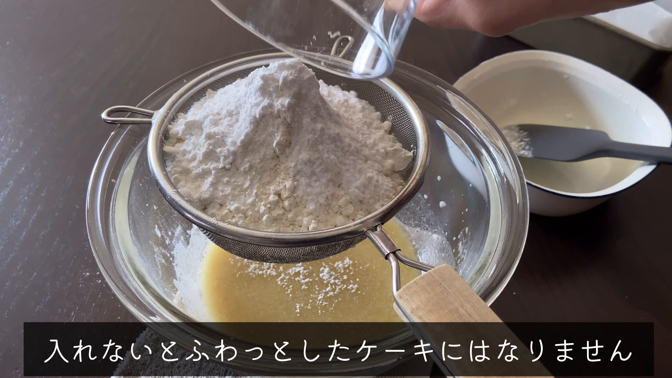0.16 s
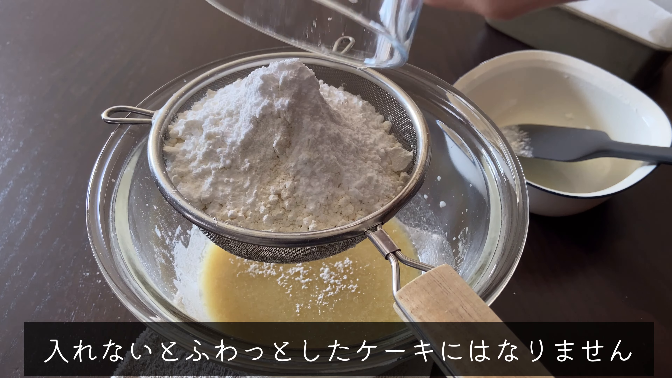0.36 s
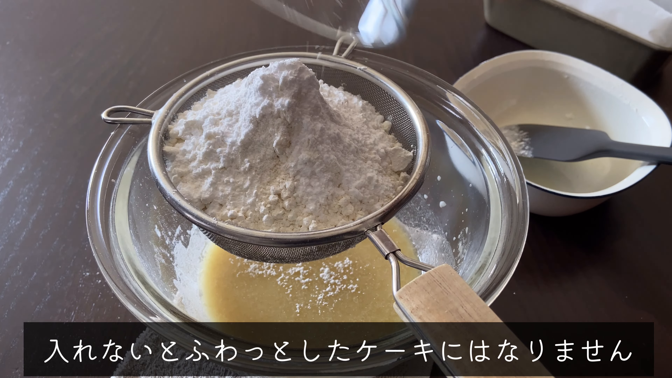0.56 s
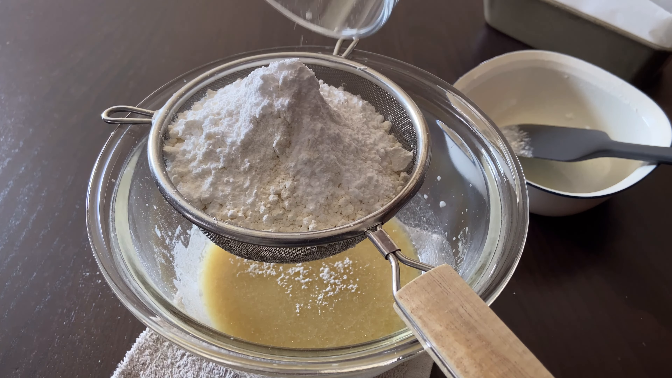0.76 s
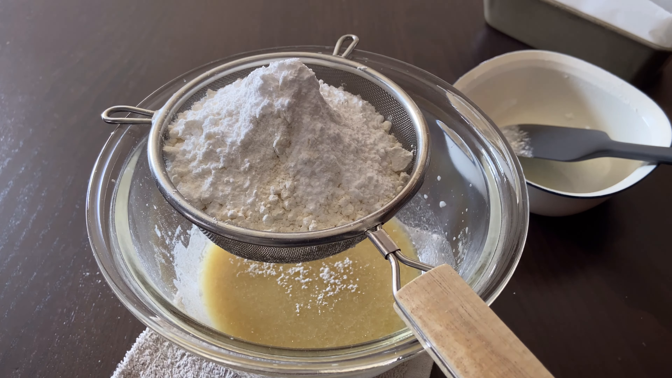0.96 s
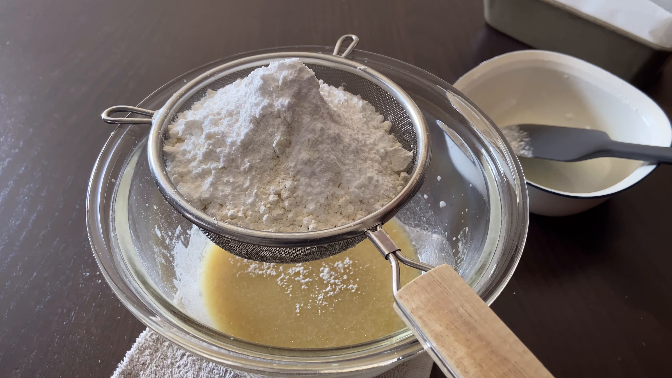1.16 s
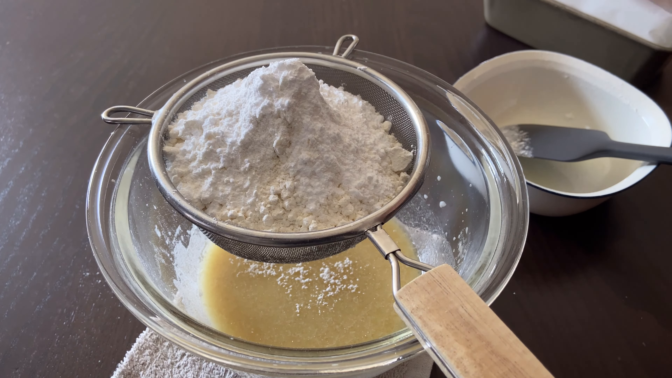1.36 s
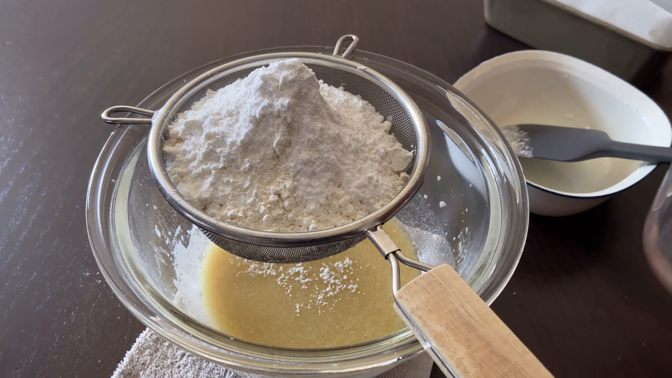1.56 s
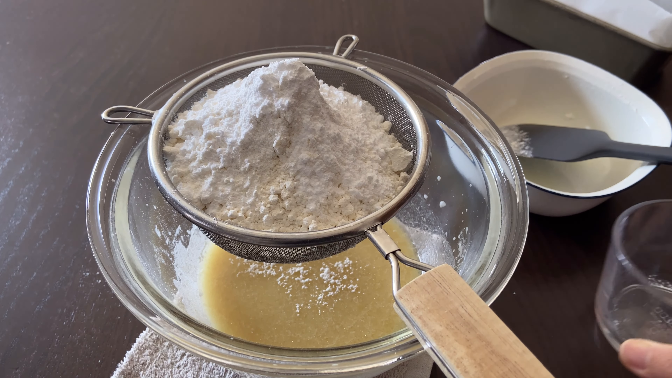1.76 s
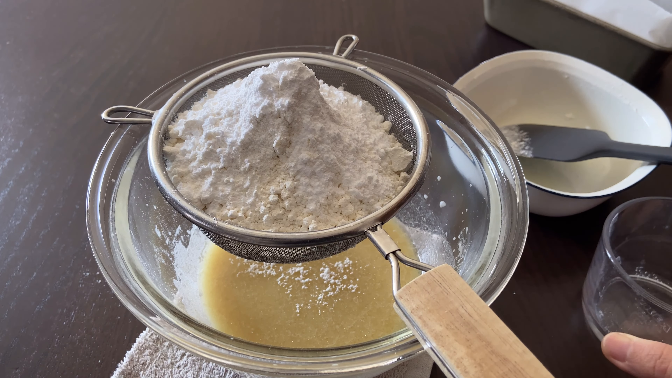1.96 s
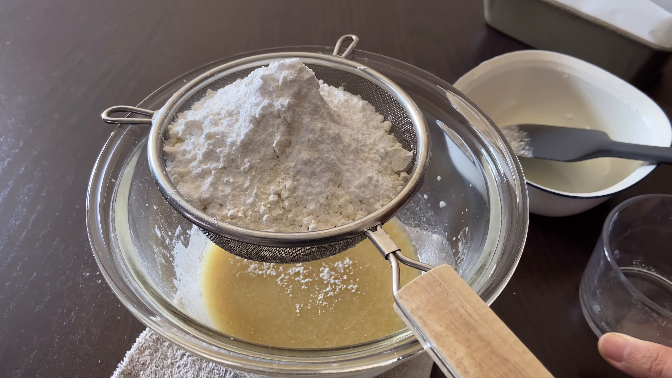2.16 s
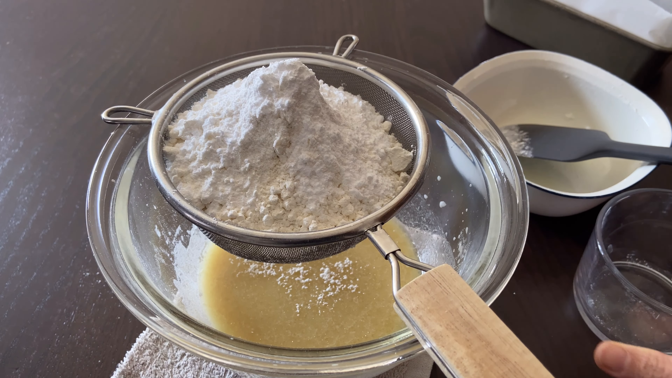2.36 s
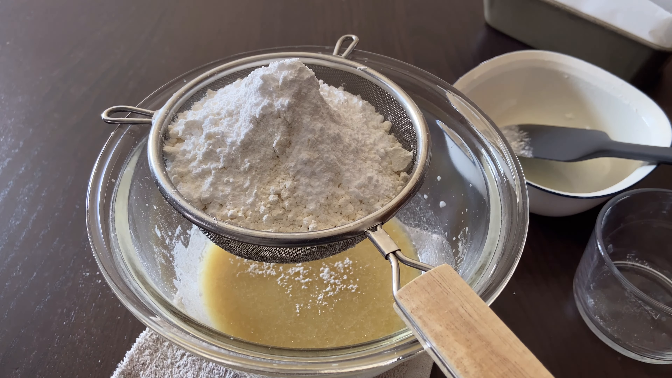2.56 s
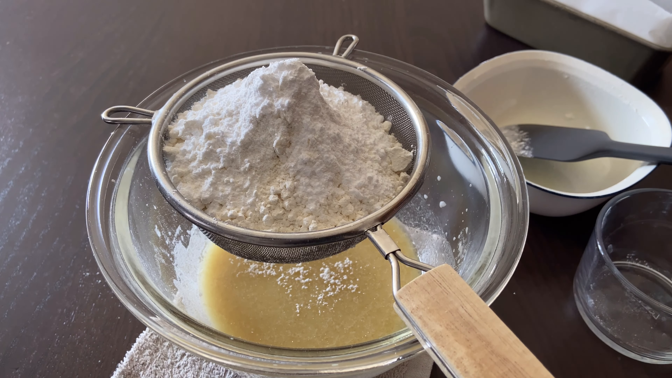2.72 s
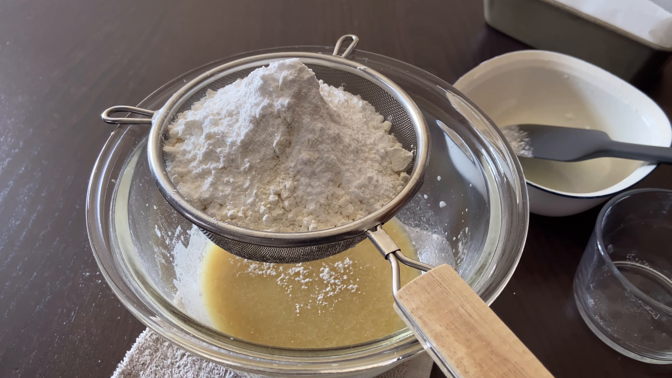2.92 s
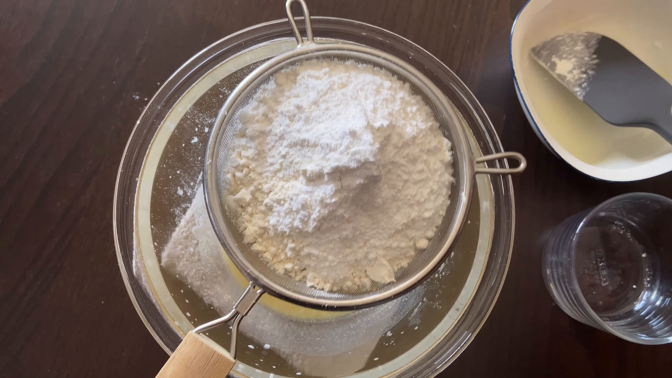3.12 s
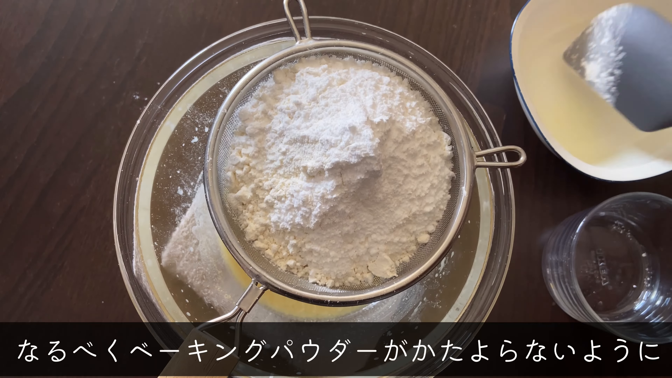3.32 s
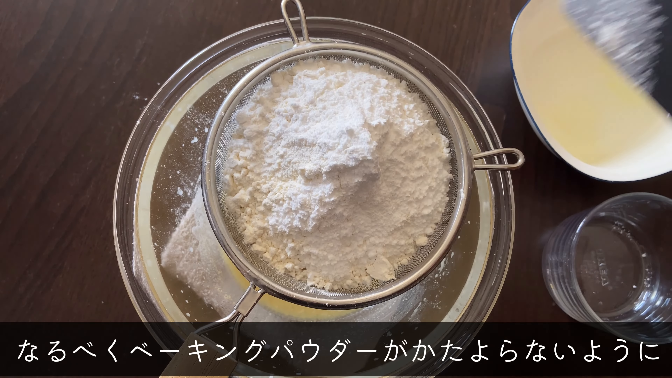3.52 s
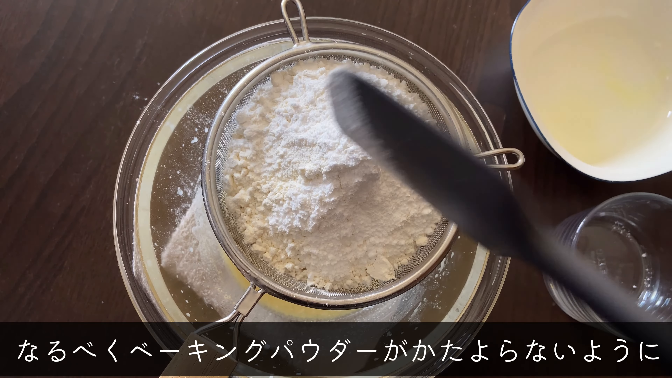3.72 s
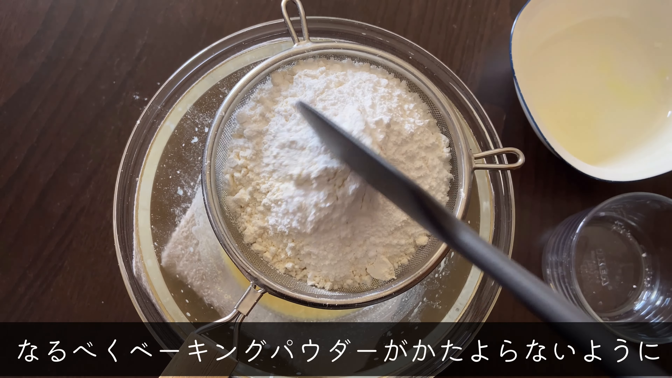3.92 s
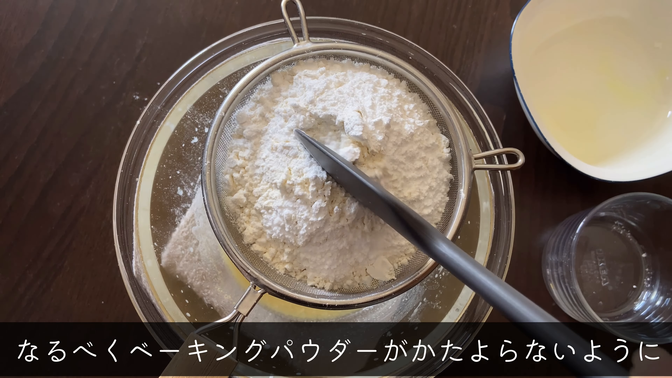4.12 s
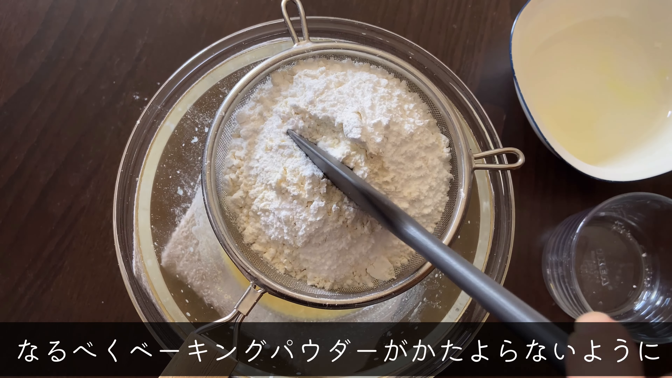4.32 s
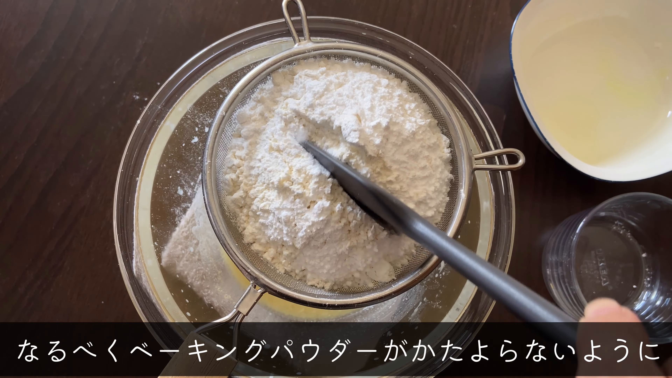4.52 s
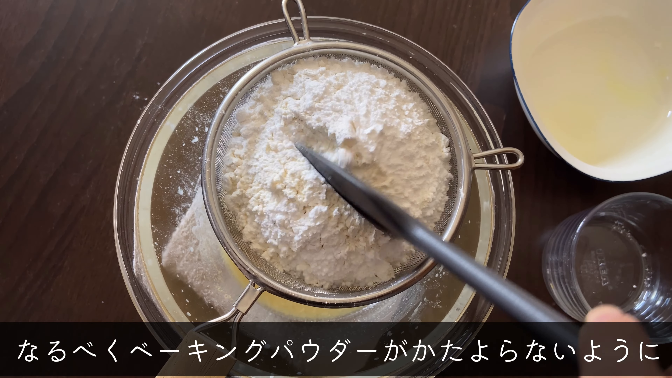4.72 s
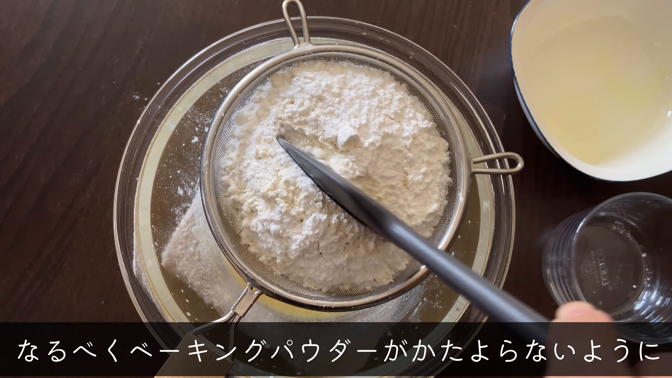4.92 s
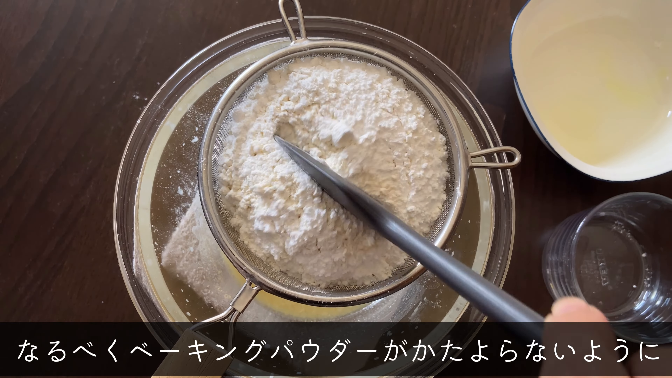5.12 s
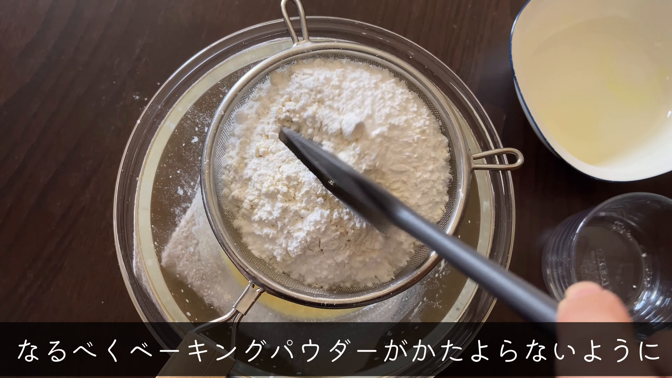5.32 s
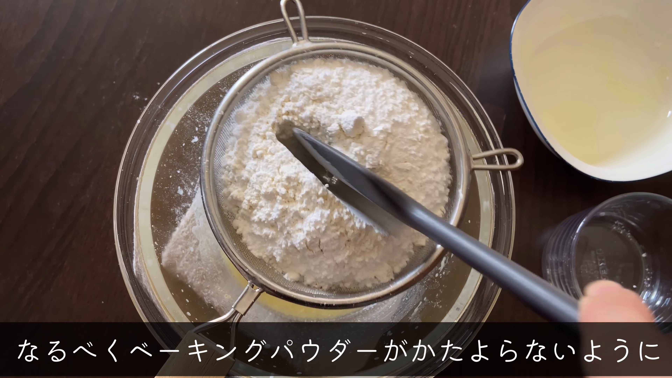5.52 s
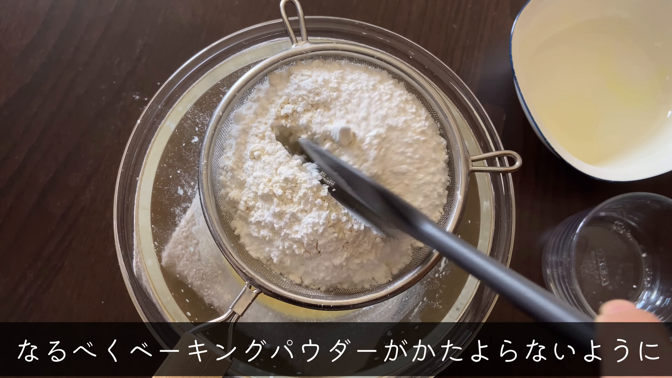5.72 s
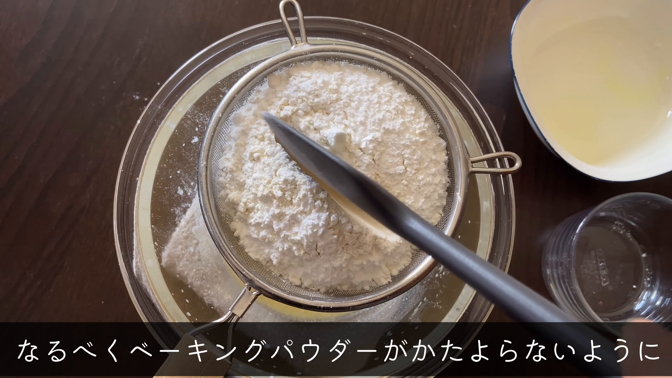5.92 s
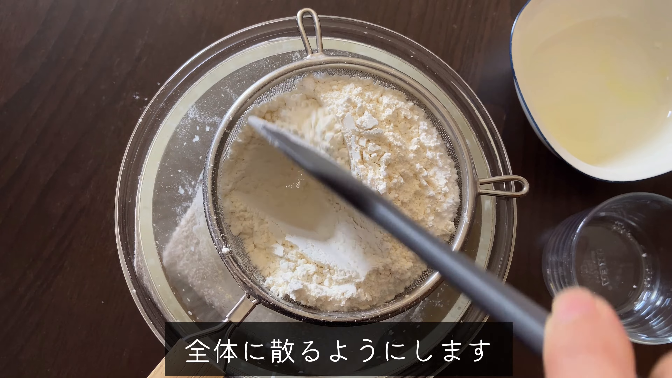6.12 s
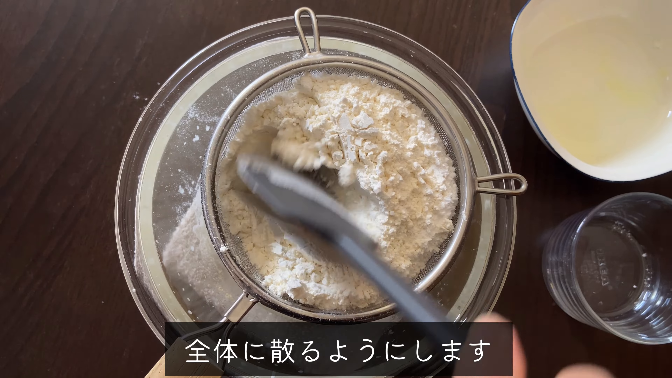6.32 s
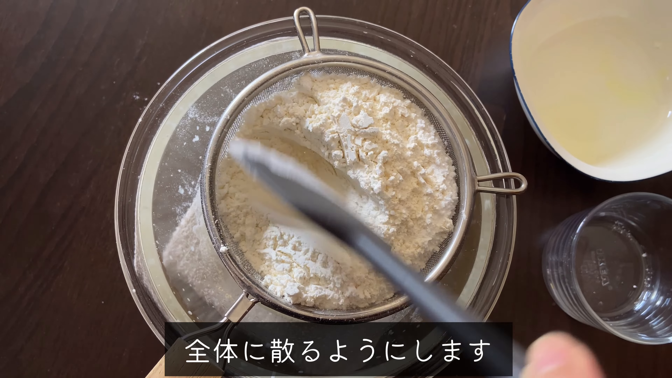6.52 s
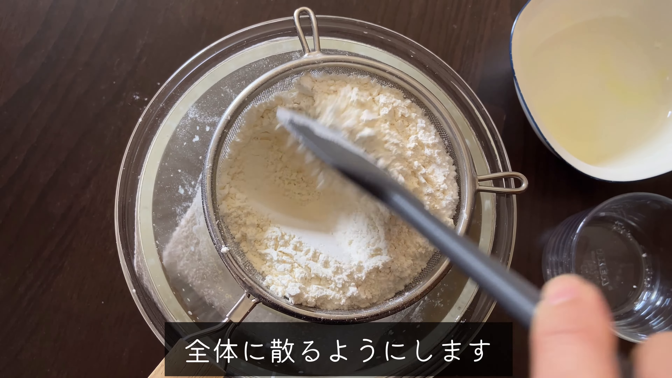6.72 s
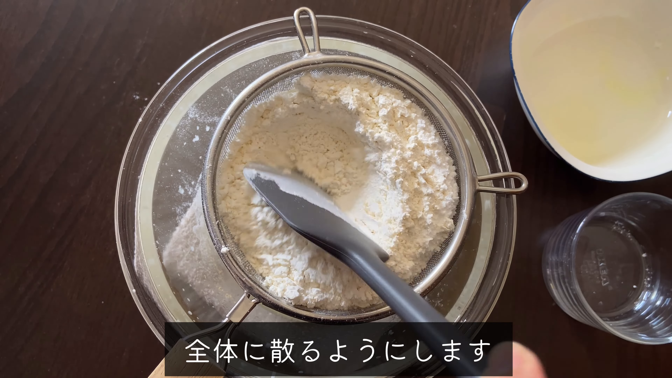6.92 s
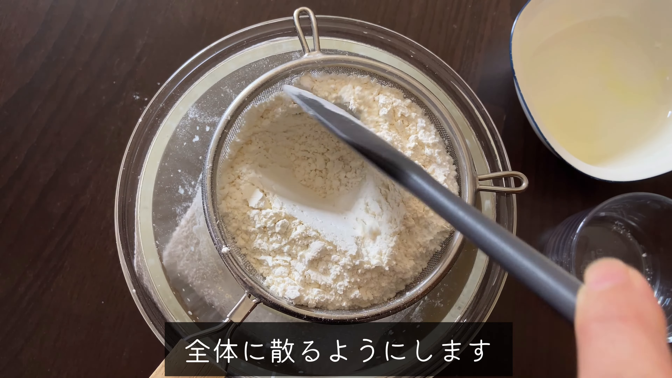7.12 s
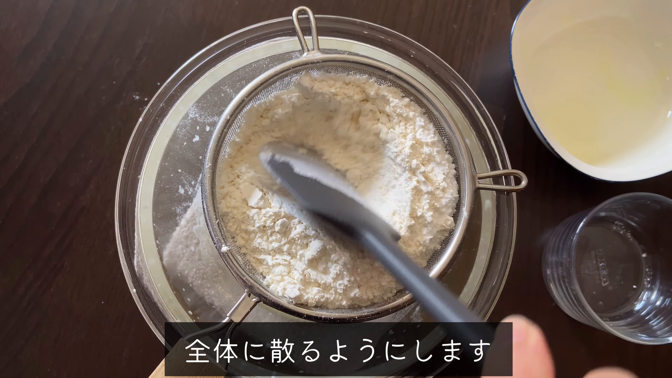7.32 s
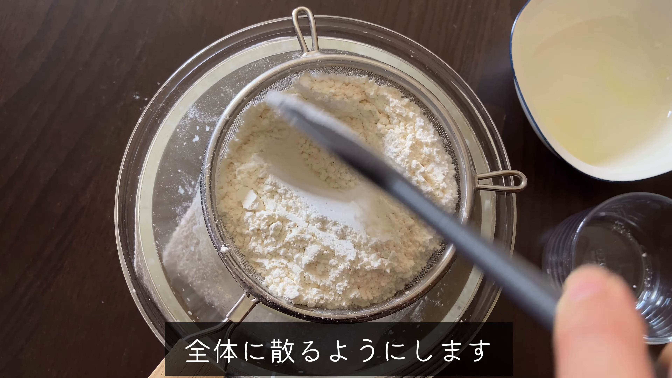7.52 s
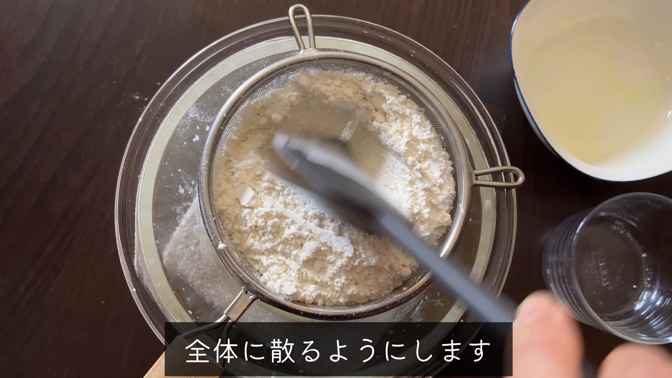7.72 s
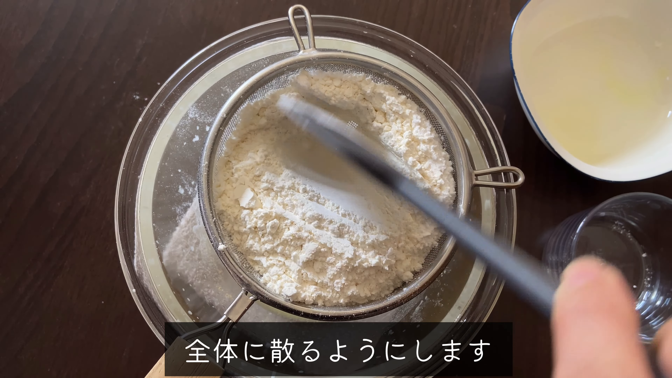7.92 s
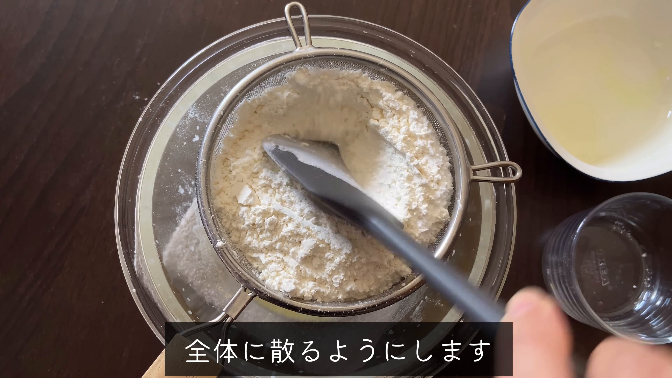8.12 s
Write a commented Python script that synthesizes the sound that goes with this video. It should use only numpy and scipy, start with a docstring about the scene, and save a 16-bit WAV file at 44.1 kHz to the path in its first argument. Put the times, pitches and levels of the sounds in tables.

```python
"""A quiet kitchen: mains hum, rumble, motor whine (sines) and air (shaped noise) run throughout. Sleeves and
flour rustle (swelling grains), mostly early on; a glass tick leads to a small glass bowl, emptied and set on
a wooden table in two knocks (struck modes, noise clatter). At 3.1 s the bass drops briefly. Then a silicone
spatula works flour in a wire sieve: taps rock it on its bowl (struck modes), the mesh tinkles faintly (high
modes), and short scrapes follow (grains through resonances). Feedback delays echo all but the rustles and tone."""
import sys
import numpy as np
from scipy import signal
from scipy.fft import rfft, irfft, next_fast_len
from scipy.io import wavfile

SR = 44100
rng = np.random.default_rng(int(sys.argv[2]) if len(sys.argv) > 2 else 0)


def store_pcm(level_fs):
    """Save levels as 16-bit WAV."""
    pcm = np.round(np.clip(level_fs, -1, 1) * 32767).astype(np.int16)
    wavfile.write(sys.argv[1], SR, np.atleast_2d(pcm).T)


N = 360297   # length [samples]


def from_db(db):
    """Logarithmic level: 20 dB is a factor of ten in amplitude."""
    return 10 ** (np.asarray(db) / 20)


def rms_one(x):
    """Normalisation to unit root-mean-square amplitude."""
    return x / np.sqrt(np.mean(x ** 2) + 1e-20)


def in_time(rows):
    """Linear interpolation of a (time [s], level [dB]) curve, sample by sample."""
    times, levels_db = np.transpose(rows)
    return np.interp(np.arange(N) / SR, times, levels_db)


def drift(rate_hz):
    """Low-passed random fluctuation: white noise through two equal poles, scaled to spread 1."""
    step = 40   # computed at every 40th sample
    r = np.exp(-2 * np.pi * rate_hz * step / SR)
    settle = 2000
    noise = rng.standard_normal(N // step + settle + 2)
    slow = signal.lfilter([1], [1, -2 * r, r * r], noise)[settle:]
    return np.interp(np.arange(N) / step, np.arange(len(slow)), rms_one(slow))


def ring(clicks, hz, t60):
    """Damped resonance: a unit click excites a decaying sine of initial height 1."""
    r = from_db(-60 / (max(t60, 1e-3) * SR))
    w = 2 * np.pi * hz / SR
    return signal.lfilter([0, np.sin(w)], [1, -2 * r * np.cos(w), r * r], clicks + 1e-18)


def band(x, low_hz, high_hz):
    """Band-pass filtering: only the range between two cut-offs is passed."""
    return signal.sosfilt(signal.butter(2, [low_hz, high_hz], "band", fs=SR, output="sos"), x)


def soften(x, hz):
    """Low-pass filtering by contact time: a contact that lasts a moment is dull."""
    return signal.sosfilt(signal.butter(2, hz, fs=SR, output="sos"), x)


def struck(times, peaks_db, modes, scatter_db, cuts_hz=None, max_lag=16):
    """Modal superposition: each pulse drives every mode by chance; modes lag [samples] between the ports."""
    at = np.round(np.array(times) * SR).astype(int)
    luck = rng.standard_normal((len(at), len(modes)))
    lags = rng.integers(-max_lag, max_lag + 1, len(modes))
    out = np.zeros((2, N))
    for k, (hz, level_db, t60) in enumerate(modes):
        clicks = np.zeros(N)
        clicks[at] = from_db(np.array(peaks_db) + level_db + scatter_db * luck[:, k])
        if cuts_hz is not None:      # a soft contact drives the high modes less
            clicks[at] /= 1 + (hz / cuts_hz) ** 2
        tone = ring(clicks, hz, t60) * (-1) ** k
        out += [np.roll(tone, max(lags[k], 0)), np.roll(tone, max(-lags[k], 0))]
    return out


def coloured(spectrum, swellings=()):
    """Spectral shaping: steady noise is given separate middle and side spectra."""
    hz, level_db, side_db = np.transpose(spectrum)
    size = next_fast_len(N)
    bins_hz = np.fft.rfftfreq(size, 1 / SR) + 1   # 1 Hz up, to keep the logarithm finite
    mid_db = np.interp(np.log(bins_hz), np.log(hz), level_db, left=-200, right=-200)
    for centre, width, lift_db in swellings:
        mid_db += lift_db * np.exp(-((bins_hz - centre) / width) ** 2)
    sides_db = mid_db + np.interp(np.log(bins_hz), np.log(hz), side_db)
    gains = from_db([mid_db, sides_db]) * np.sqrt(SR / 2)   # from level per Hz
    mid, side = irfft(rfft(rng.standard_normal((2, size))) * gains, size)[:, :N]
    return np.array([mid + side, mid - side])


def grit(per_s, spread_db):
    """Random impulse train: uneven grains, half their power shared by left and right; rms 1."""
    sizes = from_db(spread_db * np.minimum(rng.exponential(1, (3, N)), 4))
    signs = rng.choice([-1, 1], (3, N))
    grains = sizes * signs * (rng.random((3, N)) < per_s / SR)
    return rms_one(grains[0] + grains[1:])


def tones(rows, wander, apart):
    """Line spectrum: sines from (cycle count, dB, wavering dB) drift in level and phase [rad].

    The ports hear them `apart` radians either side.
    """
    out = 0
    for cycles, level_db, waver_db in rows:
        phase = 2 * np.pi * (cycles + rng.random()) + wander * drift(2.1)
        waver = np.clip(waver_db, 0, 2.5) * np.clip(drift(4.0), -2, 2)
        gain = from_db(level_db + waver)
        out = out + np.sqrt(2) * gain * np.sin(phase + apart * np.array([[-1], [1]]))
    return out


# mains lines: (frequency [Hz], relative level [dB], wavering [dB], kept within 0 to 2.5)
HUM_LINES = [(99.6, -43, 0), (202, -63, 1), (314, -88, 6.5), (380, -77.5, -2.5)]
# noise spectra: (frequency [Hz], relative level [dB per Hz], side re middle [dB])
RUMBLE_SPECTRUM = [(19.5, -93, -9), (36.2, -85, -12), (65, -69, -2.5), (83, -70.5, -5), (124, -72, -5.5),
                   (199.5, -84.5, -10), (322, -110, -7.5)]
AIR_SPECTRUM = [(113, -100, -15), (215, -83, -4.5), (337, -87.5, -5), (517, -93, 0), (950, -100, 0),
                (1340, -106, 0.5), (2160, -109, -1.5), (3360, -113, -3.5), (5400, -119, -2.5),
                (8100, -123, 1.5), (11300, -122, -3.5), (13110, -123, -0.5), (14300, -135, 7),
                (15000, -140, 4.5)]
# swellings in the air spectrum: (centre [Hz], width [Hz], lift [dB])
AIR_SWELLINGS = [(503, 46, 4.5), (1100, 142, 5), (1834, 81, 5.5), (2230, 200, 0.5), (3380, 430, 0.5)]
# steps of the room tone: (start [s], hum gain [dB], air gain [dB], low whine before the bass drop [dB])
STEPS = [(0, 1, -1.5, -69), (3.096, 0.5, 0, -63), (6.094, 0.5, -0.5, -60.5)]
# rumble gain: (time [s], level [dB])
RUMBLE_CURVE = [(0, 0.5), (3.09, 0), (3.5, -5.5), (5.6, 2.5), (6.6, 0.5), (7.6, 1), (8.17, 5.5)]
# high whine gain: (time [s], level [dB])
HIGH_WHINE_CURVE = [(0, -88.5), (1.25, -86), (1.5, -108), (2.5, -104), (3.1, -86.5), (4.9, -84.5),
                    (6.09, -87), (6.1, -82), (8.17, -81.5)]
# appliance motor speed, one per step: (turns per second [Hz])
MOTOR_SPEED = (134.2, 134.8, 135.4)
# motor tones: (multiple of the motor speed)
LOW_MULTIPLES = (5,)
HIGH_MULTIPLES = (19, 20, 23, 24, 25)
# one row per multiple: (level re whine [dB], wavering [dB], kept within 0 to 2.5)
LOW_TONES = [(0.0, 1)]
HIGH_TONES = [(-7, 4), (-5.5, 2), (-4.5, 2), (2.5, 1.5), (-6.5, 2)]
# at the second step the bass drops, stays down, then climbs back
BASS_DROP_DB, BASS_HOLD_S, BASS_RETURN_S = -9, 0.14, 0.2


def room_tone():
    """Superposition of steady sources: mains and motor lines over broadband rumble and air."""
    t, steps = np.arange(N) / SR, np.array(STEPS)
    step = np.searchsorted(steps[1:, 0], t)
    hum_db, air_db, low_db = steps[step, 1:].T
    since = t - steps[1, 0]
    climb = np.exp(-np.maximum(since - BASS_HOLD_S, 0) / BASS_RETURN_S)
    drop_db = BASS_DROP_DB * (since > 0) * climb

    turns = np.cumsum(np.array(MOTOR_SPEED)[step]) / SR
    lines = [(hz * t, *rest) for hz, *rest in HUM_LINES]
    lines.append((turns, -61, 2.5))   # the motor's own speed
    hum = from_db(hum_db + drop_db) * tones(lines, wander=0.081, apart=0.1)
    hum = hum * from_db([[.6], [-.6]])   # left of centre

    rumble_db = in_time(RUMBLE_CURVE) + 0.46 * drop_db + 1.8 * drift(0.44)
    rumble = coloured(RUMBLE_SPECTRUM) * from_db(rumble_db)

    low_rows = [(k * turns, *row) for k, row in zip(LOW_MULTIPLES, LOW_TONES)]
    high_rows = [(k * turns, *row) for k, row in zip(HIGH_MULTIPLES, HIGH_TONES)]
    low = from_db(low_db + 0.41 * drop_db) * tones(low_rows, wander=0.12, apart=1.0)
    high = from_db(in_time(HIGH_WHINE_CURVE)) * tones(high_rows, wander=0.6, apart=0.56)

    air = coloured(AIR_SPECTRUM, AIR_SWELLINGS) * from_db(air_db + 1.15 * drift(4.94))
    return hum + rumble + low + high + air


# sleeve and flour: (loudest time [s], rise over 20 dB [s], fall over 20 dB [s], middle [dB], treble [dB])
RUSTLE_SWELLS = [(0.525, 0.083, .06, -77, -76), (0.895, 0.13, .07, -77, -74), (1.24, .25, 0.17, -80, -68.5),
                 (1.335, .05, .03, -76, -76), (1.70, 0.06, .1, -81.5, -74.5), (1.78, .12, 0.041, -77, -64),
                 (2.43, 0.11, .15, -84, -69.5), (2.8, .6, 0.87, -76.5, -72.5),
                 (3.099, 0.0037, 0.36, -64, -61), (3.25, 0.14, 0.14, -70.5, -89),
                 (3.392, .05, 0.018, -78, -67), (3.648, 0.018, .05, -61.5, -84),
                 (3.8, 0.018, .12, -62, -71)]


def rustle():
    """Friction noise of cloth and powder: soft grains swell in the middle and in the far treble."""
    t, middle, treble = np.arange(N) / SR, 0, 0
    for s, rise, fall, middle_db, treble_db in RUSTLE_SWELLS:
        swell = from_db(-20 * np.maximum((s - t) / rise, (t - s) / fall))
        middle = middle + swell * from_db(middle_db)
        treble = treble + swell * from_db(treble_db)
    soft = rms_one(band(grit(9000, 2.6), 900, 5100))
    bright = rms_one(band(grit(8500, 2.0), 11000, .45 * SR))
    return middle * soft + treble * bright


# modes of the glass: (frequency [Hz], relative level [dB], t60 [s])
GLASS_MODES = [(4300, 0, 0.05), (2003, -3, .1)]


def glass_tick():
    """Free vibration: one light touch leaves the modes of the glass ringing."""
    return struck([1.337], [-59.5], GLASS_MODES, scatter_db=3.5)


# pulses of the two knocks of the glass on the table:
# (time [s], pulse strength [dB], clatter strength [dB], cut-off [Hz])
KNOCK_PULSES = [(1.8747, -9, -23, 1510), (1.8836, -25, -49, 1010), (1.8923, -13.5, -31, 900),
                (1.906, -11.5, -45, 1005), (1.941, -38, -55, 600), (1.991, -26.5, -65, 605),
                (2.1, -39, -58, 600), (2.146, -35, -54, 700), (2.1488, -16.5, -37, 1220),
                (2.151, -20.5, -38.5, 925), (2.167, -24, -42.5, 900), (2.18, -21.5, -46, 600)]
# modes of the wooden table: (frequency [Hz], relative level [dB], t60 [s])
TABLE_MODES = [(115.5, -13, 0.56), (167, -17, 0.24), (202, -27, 0.73), (236, 1, 0.13), (312, -19.5, 0.25),
               (353, -9, 0.16), (472, -4.5, 0.16), (582.5, -9.5, .2), (686, -2.5, 0.26),
               (749.3, -4.5, 0.17), (841, -14, 0.26), (900, -28.5, 0.3), (1034, -15, 0.17),
               (1203, -10.5, 0.12), (1301, -8, 0.17), (1500, -10, 0.07), (1610, -24, 0.13)]
# clatter of the many small modes: (band centre [Hz], relative level [dB], t60 [s])
CLATTER_BANDS = [(310, -6, 0.3), (484, -3, 0.22), (850, 1.5, 0.091), (1176, -8.5, 0.24), (2180, -11, 0.091),
                 (3140, -25.5, 0.19), (4800, -33.5, 0.58), (7000, -45, .1), (11500, -16, 0.074)]


def knocks():
    """Impact excitation: pulses drive clear low table modes over a clatter that dies band by band."""
    s, pulse_db, clatter_db, cut_hz = np.transpose(KNOCK_PULSES)
    out = struck(s, pulse_db - 5.5, TABLE_MODES, scatter_db=3.0, cuts_hz=cut_hz, max_lag=40)
    short_modes = [(482, -3, 0.017), (1056, -1.5, 0.023)]   # Hz, dB, t60 s
    out += struck(s, pulse_db, short_modes, scatter_db=1.0, cuts_hz=cut_hz)
    out = soften(out, 1700)
    at = np.round(s * SR).astype(int)
    for hz, level_db, t60 in CLATTER_BANDS:
        pulses = np.zeros(N)
        pulses[at] = from_db(clatter_db) / (1 + (hz / cut_hz / 3.2) ** 2)
        decay = from_db(-60 / (t60 * SR))
        dying = soften(signal.lfilter([1], [1, -decay], pulses + 1e-18), 440)
        noise = rng.standard_normal((3, N))
        noise = noise[0] + np.sqrt(hz / 1500) * noise[1:]      # the lows are alike at both ports
        out += from_db(level_db) * dying * rms_one(band(noise, hz / 1.44, hz * 1.137))
    return out * from_db([[-1.3], [1.3]])   # right of centre


# spatula taps: (time [s], click peak [dB], click frequency [Hz], thud strength [dB], bright edge peak [dB])
SPATULA_TAPS = [(3.6448, -44, 3040, -50, -60), (3.795, -60, 3020, -70, -54),
                (4.8726, -57, 2260, -38.5, -66), (4.962, -64, 1780, -38, -62), (4.979, -39, 1720, -32, -52),
                (5.0817, -42.5, 2760, -43, -52), (5.0857, -45.5, 2620, -39, -43),
                (5.2213, -73, 1640, -49, -70), (5.3273, -55, 1430, -43.5, -66),
                (5.449, -35.5, 2820, -29, -46), (5.455, -41, 1590, -30.5, -52), (5.47, -34, 2830, -29, -32),
                (5.5667, -39.5, 1460, -37, -56), (5.58, -52, 1840, -30, -64),
                (5.699, -61, 1470, -42.5, -68), (6.0928, -48.5, 1890, -45, -42),
                (7.614, -58, 1700, -60, -60), (7.9328, -55, 1700, -47.5, -66), (8.001, -59, 1450, -70, -62)]
# the sieve rocking on its bowl: (frequency [Hz], relative level [dB], t60 [s])
SIEVE_MODES = [(233.6, 1, 0.043), (346, 0, 0.053), (401, -3, 0.031), (643, -1.5, 0.027), (826, -6, 0.027),
               (1140, -20.5, 0.029)]


def taps():
    """Impulse response: a dry click, two short rings and a bright edge; the sieve rocks 2 ms later."""
    s, click_db, click_hz, thud_db, edge_db = np.transpose(SPATULA_TAPS)
    out = soften(struck(s + .002, thud_db - 3, SIEVE_MODES, scatter_db=2.5), 2000)
    size = 600   # samples
    pulse = signal.unit_impulse(size)
    edge = band(pulse, 4500, 6300)
    edge /= np.abs(edge).max()
    rings = 0.49 * ring(pulse, 2800, 0.0074) + 0.14 * ring(pulse, 4440, 0.0051)
    for when, level_db, hz, bright_db in zip(s, click_db, click_hz, edge_db):
        click = band(ring(pulse, hz, 0.0043) + rings, 1200, 6500)
        click = from_db(level_db) * click / np.abs(click).max() + from_db(bright_db) * edge
        i = round(when * SR)
        out[:, i:i + size] += [np.roll(click, 3), click]   # left is three samples late
    return out


# mesh tinkles: (time [s], strength [dB])
MESH_TINKLES = [(4.561, -68), (4.6892, -70), (4.8549, -71), (4.8894, -75), (5.0409, -66), (5.0664, -65),
                (5.1287, -71), (5.5075, -67), (5.529, -53), (5.537, -72), (5.5967, -71), (5.63, -63.5),
                (5.6444, -74)]
# modes of the mesh: (frequency [Hz], relative level [dB], t60 [s])
MESH_MODES = [(9490, 12, 0.031), (10700, -14, .02), (12550, -8, 0.052), (7600, -16, .012),
              (13500, -7, .012)]
# the touches of one tinkle swell and fade: (relative level [dB])
TOUCH_LEVELS = [-13, -6, -6.5, -9, -10]


def tinkles():
    """Repeated excitation: quick touches jingle high mesh modes, opposite in sign at the two ports."""
    s, strength_db = np.transpose(MESH_TINKLES)
    gaps = rng.uniform(0.002, 0.009, (len(s), len(TOUCH_LEVELS)))
    touches = s[:, None] + np.cumsum(gaps, axis=1) - .008
    touches_db = strength_db[:, None] + TOUCH_LEVELS
    jingle = struck(touches.ravel(), touches_db.ravel(), MESH_MODES, scatter_db=2.5)[0]
    return jingle * np.array([[1.3], [-.5]])


# scrapes along the mesh: (time [s], length [s], frame level [dB], frame frequency [Hz], rocking level [dB],
# rocking frequency [Hz], grit level [dB], grit frequency [Hz], treble level [dB]); levels before the stroke
MESH_SCRAPES = [(6.276, 0.096, -58, 696, -72, 248, -60.5, 2270, -68),
                (6.793, 0.05, -54.5, 684, -59, 249, -57, 1370, -72.5),
                (7.243, 0.071, -50.5, 660, -51.5, 247, -58.5, 1820, -70),
                (7.676, 0.059, -43, 625, -42, 251, -50.5, 1790, -65),
                (8.059, 0.053, -40, 740, -46.5, 344, -46, 2000, -61.5)]
SETTLE_DB, SETTLE_S = -14, 0.029   # flour trickles on after a scrape


def scrapes():
    """Stick-slip excitation: a blade skipping over wires drives frame and rocking modes, grit and hiss."""
    t, out = np.arange(N) / SR, np.zeros((2, N))
    skips, catching = grit(2500, 1.0), from_db(1.4 * drift(120.0))
    grains, treble = grit(2000, 5.9), band(grit(12000, 2.8), 3500, 17000)
    rocking_t60 = SIEVE_MODES[0][2]
    for s, length, frame_db, hz, rocking_db, rocking_hz, grit_db, grit_hz, treble_db in MESH_SCRAPES:
        span = slice(round((s - .02) * SR), round((s + length + 0.095) * SR))
        now = t[span]
        progress = np.clip((now - s) / length, 0, 1)
        arch = np.maximum(np.sin(np.pi * progress ** 0.62), 0) ** 0.58
        stroke = rms_one(catching[span] ** .5) * arch
        both = skips[0, span] + 0.14 * skips[:, span]
        frame = rms_one(band(ring(both, hz, 0.021), hz / 2, hz * 2))
        rocking = ring(both, rocking_hz, rocking_t60)
        rocking = rms_one(band(rocking, rocking_hz / 1.35, rocking_hz * 1.07))
        body = from_db(frame_db) * frame + from_db(rocking_db) * rocking
        rasp = from_db(grit_db) * rms_one(band(grains[:, span], grit_hz / 2.13, grit_hz * 1.16))
        hiss = from_db(treble_db) * rms_one(treble[:, span])
        settling = np.exp(-np.maximum(now - s - length, 0) / SETTLE_S)
        trickle = from_db(SETTLE_DB) * (now > s + length / 2) * settling
        # the body sounds only while the blade bears down; the hiss spans the whole stroke
        out[:, span] += stroke ** 2 * body + (stroke ** 2 + trickle) * rasp + (stroke + trickle) * hiss
    return out


KITCHEN_T60_S, WALL_CUT_HZ = 0.33, 2200


def kitchen(x):
    """Reverberation by recirculation: eight feedback delays a side, duller on every round."""
    out, dull = np.zeros((2, N)), np.exp(-2 * np.pi * WALL_CUT_HZ / SR)
    lags = (np.geomspace(.011, .037, 16) * SR).astype(int)   # 11 to 37 ms, in samples
    for k, lag in enumerate(lags):
        loop, state = x.copy(), [0.]
        gain = from_db(-60 * lag / SR / KITCHEN_T60_S)
        for i in range(lag, N, lag):
            back, state = signal.lfilter([gain * (1 - dull)], [1, -dull], loop[i - lag:i], zi=state)
            loop[i:i + lag] += back[:N - i]
        out[k % 2] += (loop - x) * (-1) ** (k // 2)
    return out


def scene():
    """Superposition: near sounds, their echo in the kitchen, rustles and the room tone."""
    near = glass_tick() + knocks() + taps() + tinkles() + scrapes()
    echo = from_db(-18) * kitchen(near.mean(axis=0))
    return room_tone() + rustle() + near + echo


def record(dry):
    """Sum-and-difference filtering: the microphone pair dips near 9 kHz (sum) and 12 kHz (difference)."""
    left, right = np.roll(dry[0], 1), dry[1]      # the left port hears one sample late
    mid, side = (left + right) / 2, (left - right) / 2
    mid = signal.sosfilt(signal.butter(3, [8200, 9750], "bandstop", fs=SR, output="sos"), mid)
    side = signal.sosfilt(signal.butter(3, [11300, 13300], "bandstop", fs=SR, output="sos"), side)
    top_cut = signal.cheby2(12, 60, 15200, fs=SR, output="sos")   # 60 dB down from 15.2 kHz
    return signal.sosfilt(top_cut, [mid + side, mid - side])


dry = scene()
out = record(dry)
store_pcm(out)
```